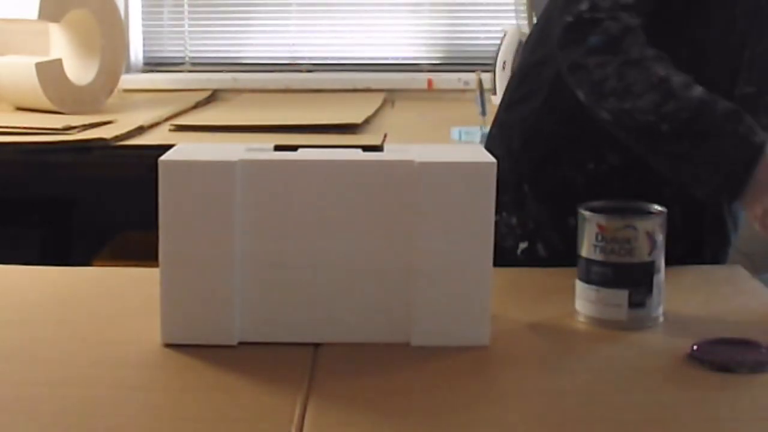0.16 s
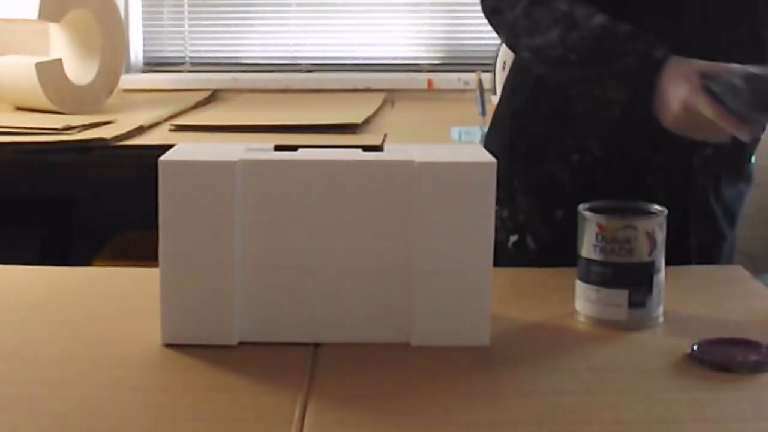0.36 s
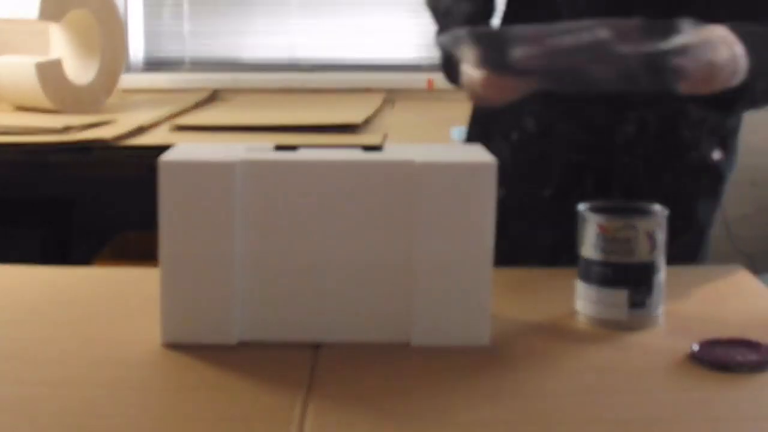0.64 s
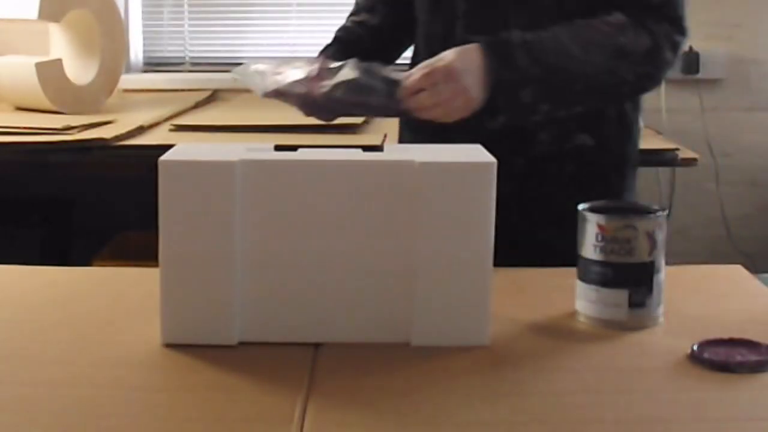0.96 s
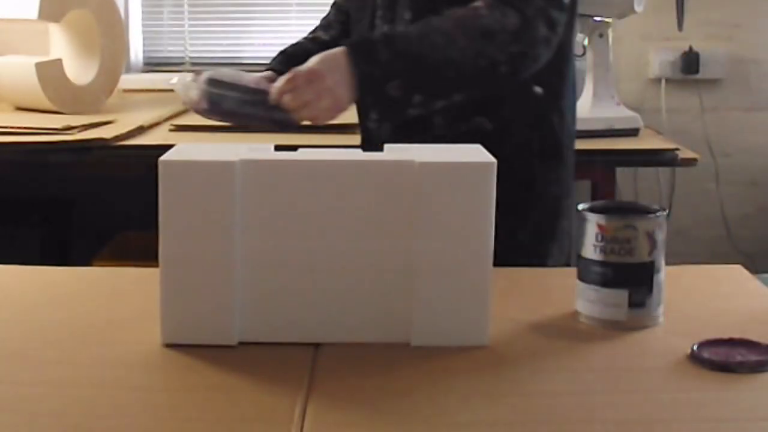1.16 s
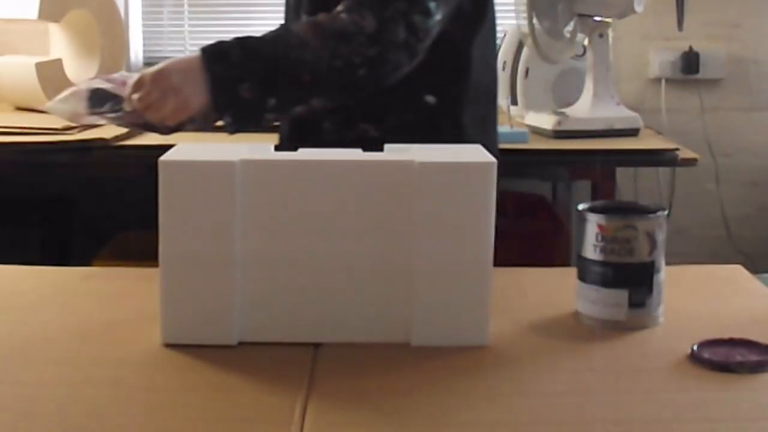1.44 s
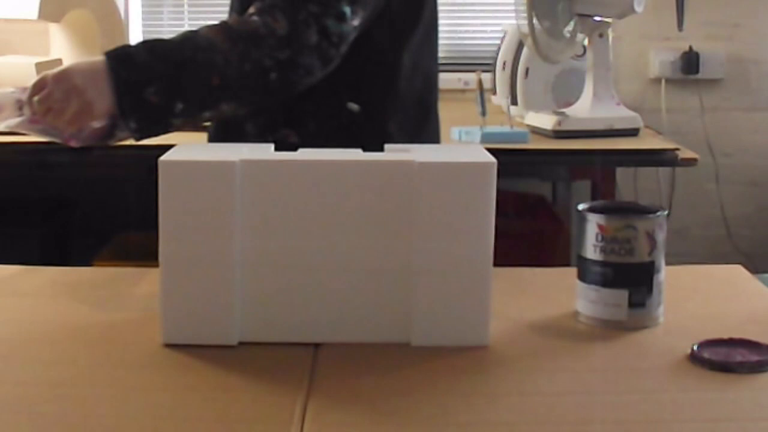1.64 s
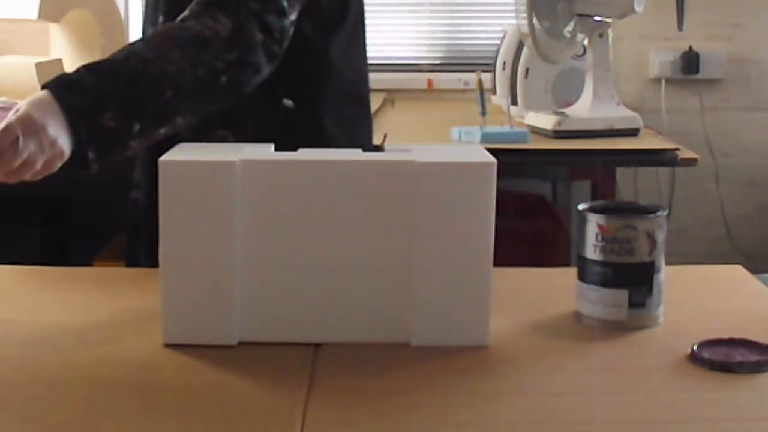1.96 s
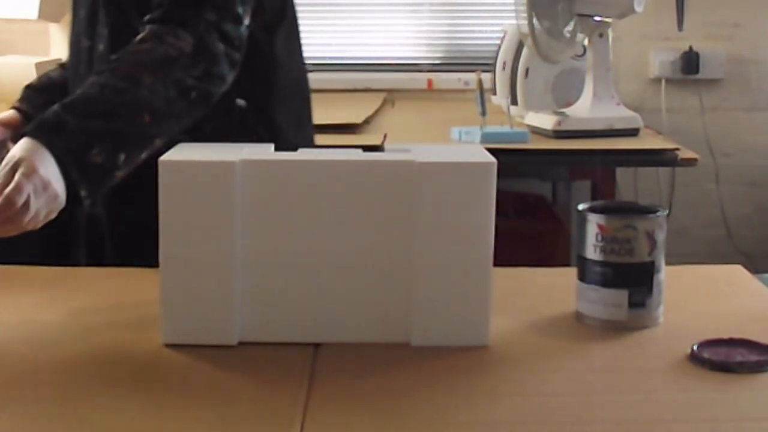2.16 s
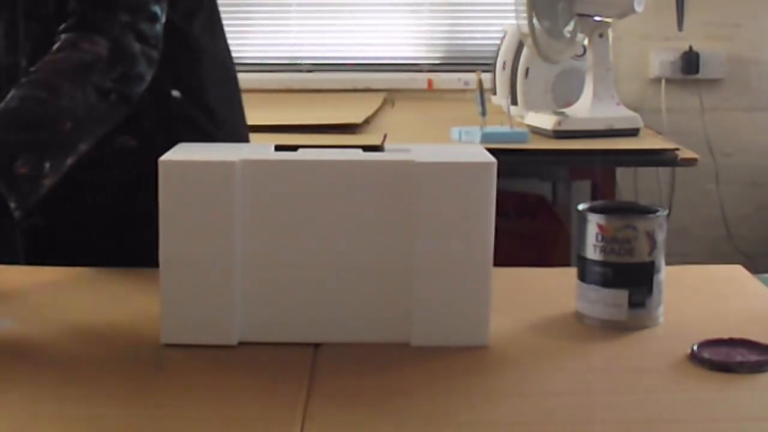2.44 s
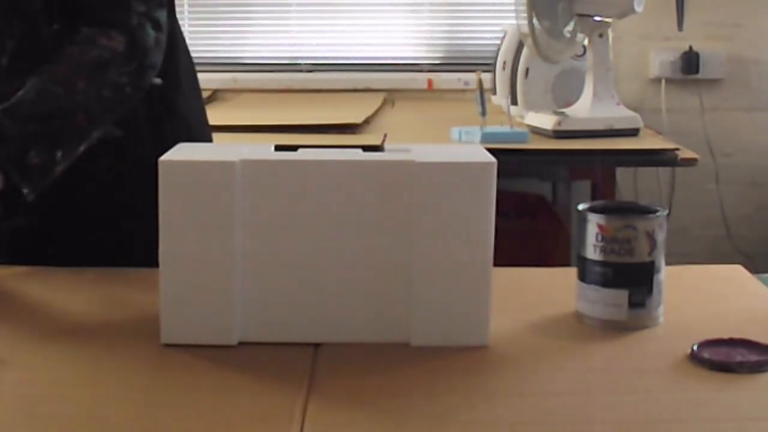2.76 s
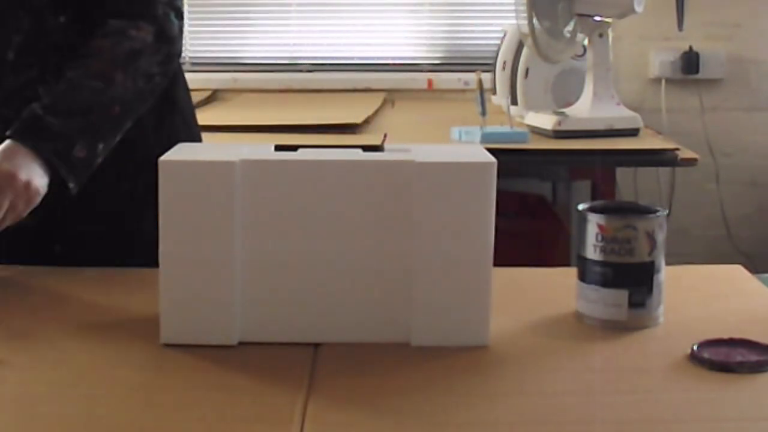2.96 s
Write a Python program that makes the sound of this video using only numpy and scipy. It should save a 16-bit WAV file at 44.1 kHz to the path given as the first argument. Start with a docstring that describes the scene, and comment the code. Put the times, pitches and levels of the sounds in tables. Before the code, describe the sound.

Plastic packaging crinkles and snaps in uneven bursts, with faint low hoots and dull bumps beneath, then thins and returns briefly near the end. Close microphone in a small room with short reflections and quiet hiss.

```python
"""Hiss, hum and a deep rumble of moving air open a small workshop, and a thin, sticky plastic film crackles close by.
A paint tray and roller in that wrap are picked up, carried across the room and put aside before two close ports.
The crackle is random clicks through film resonances, and each snapping crease is a quick run of clicks that rings.
Short low hoots are sine bursts; soft tray bumps, sleeve brushes and air puffs are swells of filtered noise.
Close reflections and a short tail place the handling in the room."""
import sys
import numpy as np
from scipy import signal
from scipy.fft import rfft, irfft
from scipy.io import wavfile

SR = 44100
rng = np.random.default_rng(int(sys.argv[2]) if len(sys.argv) > 2 else 0)


def store_pcm(level_fs):
    """Save levels as 16-bit WAV."""
    pcm = np.round(np.clip(level_fs, -1, 1) * 32767).astype(np.int16)
    wavfile.write(sys.argv[1], SR, np.atleast_2d(pcm).T)


N = 136710  # samples, 3.1 s

# steady tones in the room, a throb, hum and whine: pitch_hz, mean level_db (rms)
HUM_TONES = [(29.5, -48.5), (100.5, -55.5), (1786, -63)]
# spectrum of the room's hiss: frequency_hz, relative density_db
HISS_SPECTRUM = [(12, -56), (20, 8.5), (42, -15.5), (175, -17.5), (404, -18), (649, -23), (958, -28),
                 (1230, -27.5), (1380, -18.5), (1630, -21.5), (2270, -22.5), (3080, -16.5), (5230, -38.5),
                 (13500, -55.5), (15500, -47)]
# puffs of air on the microphone: start_s, length_s, level_db at the crest
AIR_PUFFS = [(0.814, 0.13, -26), (1.404, 0.1, -31.5), (2.022, 0.2, -35)]
# how hard the film is worked: time_s, effort_db, treble_db (sliding film, before SLIDE_DB)
FILM_HANDLING = [(0, -46, -16), (0.12, -51.5, -7), (0.204, -44, -24.0), (0.229, -28.5, -5),
                 (0.27, -26.5, -8.5), (0.319, -32.5, -30), (0.35, -32.5, -10), (0.42, -29, -20),
                 (0.49, -31.5, -19), (0.54, -27, -13), (0.61, -31.5, -19), (0.67, -31.5, -31),
                 (0.72, -39, -15), (0.77, -35.5, -5), (0.805, -44, -19), (0.855, -41, -26),
                 (0.873, -29.5, -27), (0.91, -35, -4), (0.943, -22, -13), (0.996, -29.5, -8),
                 (1.04, -27, -12), (1.08, -26.5, -25), (1.12, -27, -13), (1.152, -24, -11),
                 (1.247, -21, -13.5), (1.29, -27.5, -14), (1.35, -29, -13), (1.401, -24.0, -10),
                 (1.458, -22, -14), (1.55, -24, -8.5), (1.679, -23.5, -11.5), (1.735, -31, -37),
                 (1.785, -41, -27), (1.83, -34.5, -13), (1.92, -33.5, -24), (1.965, -39.0, -23),
                 (2.06, -46, -2), (2.17, -44.5, -20), (2.282, -42, -21.0), (2.332, -28.0, -25),
                 (2.385, -36, -24), (2.44, -30, -7.5), (2.474, -27.5, -23), (2.52, -40, -19.0),
                 (2.68, -40, -15), (2.79, -38.5, -14), (2.829, -31.5, -5.5), (2.889, -25.0, -12.5),
                 (2.94, -34.0, -15), (2.968, -30.0, -26), (3.018, -40, -7), (3.1, -32.5, -15)]
# spectrum of the plastic film: frequency_hz, relative density_db
FILM_SPECTRUM = [(240, -50), (400, -13.5), (493, -12.5), (673, -13.5), (880, -11.5), (1200, -16),
                 (1550, -10.5), (1740, -7), (2150, -8.5), (2770, -4), (3510, -1), (5820, -16),
                 (10400, -36.5), (14000, -51)]
# bands in which small buckles ring: centre_hz, level_db (relative, before the film spectrum)
BUCKLE_BANDS = [(900, 2.5), (1900, -5), (2800, 4), (3700, -8.5), (5500, -8.5), (10000, -6)]
# creases that snap: start_s, level_db (before the part levels), ring_hz, treble_db (before SNAP_TREBLE_DB)
CREASE_SNAPS = [(0.0187, -24.5, 3260, -30), (0.0931, -27.5, 2830, -28), (0.3032, -12.5, 3500, -49),
                (0.5242, -16, 3400, -28), (0.5942, -16.5, 2740, -19), (0.6501, -17.5, 2730, -33),
                (0.8663, -21.5, 3490, -29), (0.9218, -9.5, 2660, -31), (0.9323, -8.5, 3470, -25),
                (1.015, -13.5, 2750, -32), (1.0929, -9.5, 3950, -22), (1.1325, -7.5, 3670, -12),
                (1.2248, -9, 3130, -14), (1.2304, -6, 3100, -28), (1.456, -19, 3330, -29),
                (1.5942, -14.5, 3100, -33), (1.715, -20, 3220, -30), (1.8028, -18.5, 3460, -36),
                (1.8095, -14.5, 3200, -35), (1.854, -9.5, 3300, -41), (1.891, -16.5, 3120, -31),
                (1.985, -24.5, 3250, -7), (2.0463, -26.5, 3620, -23), (2.0708, -15.5, 3300, -11.5),
                (2.1894, -18, 3240, -14.5), (2.2913, -12.5, 2640, -45), (2.309, -8.5, 3320, -34),
                (2.403, -13, 2670, -24), (2.4634, -13.5, 3360, -12.5), (2.605, -18.5, 2840, -21),
                (2.8419, -8, 2800, -38), (3.0009, -18, 3450, -13)]
# short soft hoots: time_s (HOOT_LEAD_S after the onset), level_db (before HOOT_DB), pitch_hz
SOFT_HOOTS = [(0.1, -28, 306), (0.205, -27, 302), (0.298, -27, 296), (0.401, -26, 298), (0.432, -28, 290),
              (0.5, -29.5, 304), (0.568, -26, 301), (0.618, -28.5, 290), (1.048, -25, 305),
              (1.155, -27.5, 290), (1.23, -25, 283), (1.359, -23.5, 288), (1.437, -29.5, 277),
              (1.62, -28, 274)]
# dull scuffs of tray and sleeve: start_s, length_s, level_db at the crest, centre_hz
DULL_SCUFFS = [(0.683, 0.074, -45, 101), (0.922, 0.054, -42, 900), (1.196, .11, -35, 910),
               (1.208, 0.089, -40, 170), (1.373, 0.031, -29.5, 860), (1.278, 0.23, -43, 131),
               (2.003, 0.045, -41, 110), (2.045, 0.095, -37, 75), (2.062, 0.33, -41, 283),
               (2.164, 0.085, -43, 700), (2.308, 0.01, -26, 1390), (2.448, 0.04, -34, 756),
               (2.37, 0.13, -42.5, 110)]

TONE_DB, TONE_WAVER_DB = -40, 0.7  # hiss level; spread of the slow waver of hiss and tones
RUMBLE_DB, PUFF_HZ = -46, 20.4
CRACKLE_PER_S, CRACKLE_SPREAD_DB = 2500, 4  # buckling rate at an effort of BUSY_DB
BUSY_DB, RATE_POWER = -25, 0.76  # how the rate follows the effort
CRACKLE_DB, RUB_DB, SLIDE_DB = -3.5, -8.5, -8.5  # relative to the effort
OWN_SHARE = 0.91  # share of the buckle power that rings in single bands
FLUTTER_DB, FLUTTER_PER_S = 2.37, 180
TREBLE_HZ, TREBLE_WIDTH_HZ = 6940, 3820
TICKS_PER_S, TICK_SPREAD_DB, TICK_DB, TICK_TREBLE_DB = 90, 2.5, -9, -11.5
SNAP_DB, SNAP_RING_DB, SNAP_TREBLE_DB = -8.5, -5.5, 1  # broad part, ring, treble
SNAP_FIRST_DB = 3.5  # first click, over the crest of the run that follows
SNAP_DECAY_S, SNAP_AFTER_PER_S, SNAP_WIDTH_HZ = 0.0029, 1800, 730
HOOT_S, HOOT_LEAD_S, HOOT_DB = 0.032, 0.0078, -6
EARLY_S, EARLY_DB = 0.011, -6  # close reflections
ROOM_T60_S, ROOM_DB = 0.27, -9  # tail
SHIFT_S = 0.025  # time between reflection patterns
PORT_LAG_S, PORT_BASS_HZ = 2.2e-5, 293  # lag in the treble; half of it at PORT_BASS_HZ
SIDE_DB, SIDE_HZ = -2.5, 8100
TOP_HZ = 14800


def undb(db):
    """Decibels to gain."""
    return 10 ** (np.asarray(db) / 20)


def unit(x):
    """Scale to rms 1."""
    return x / np.sqrt(np.mean(x ** 2) + 1e-20)


def noise():
    """White noise."""
    return rng.standard_normal(N)


def walk(rate):
    """Random wander with `rate` new targets a second, joined by straight lines."""
    targets = rng.standard_normal(1000)
    return 0.86 * np.interp(np.arange(N) / SR * rate, np.arange(1000), targets)


def band(x, hz, width_hz):
    """One resonance."""
    centre_hz = min(hz, 0.45 * SR)
    b, a = signal.iirpeak(centre_hz, hz / min(width_hz, 0.3 * SR), fs=SR)
    return signal.lfilter(b, a, x)


def double_band(x, hz, width_hz):
    """Two equal resonances in series, for steeper skirts."""
    return band(band(x, hz, width_hz), hz, width_hz)


def treble(x):
    """The bright, papery band of the film."""
    return double_band(x, TREBLE_HZ, TREBLE_WIDTH_HZ)


def colour(x, points):
    """Causal minimum-phase filter through (frequency_hz, level_db) points."""
    hz, db = np.array(points).T
    size = 8192
    f = np.maximum(np.fft.rfftfreq(size, 1 / SR), 1)
    log_gain = np.log(undb(np.interp(np.log(f), np.log(hz), db)))
    # folding the cepstrum onto positive time makes the filter causal
    cepstrum = irfft(log_gain)
    cepstrum[1:size // 2] *= 2
    cepstrum[size // 2 + 1:] = 0
    impulse = irfft(np.exp(rfft(cepstrum)))
    return signal.fftconvolve(x, impulse)[:len(x)]


def swell(t, start, length):
    """A rounded rise and fall."""
    return np.sin(np.pi * np.clip((t - start) / length, 0, 1))


def clicks(per_s, spread_db):
    """Random clicks, many small and a few large; sparser ones are larger, which holds the mean power."""
    happens = rng.random(N) < per_s / SR
    size = np.minimum(rng.exponential(size=N), 3)
    sign = np.sign(noise())
    return unit(happens * sign * undb(spread_db * size) / np.sqrt(per_s))


def room_tone(t):
    """Wavering hiss with sine tones for a deep throb, mains hum and a thin whine."""
    out = unit(colour(noise(), HISS_SPECTRUM)) * undb(TONE_DB + TONE_WAVER_DB * walk(7.6))
    for hz, db in HUM_TONES:
        level = undb(db + TONE_WAVER_DB * walk(5.2))
        out += level * np.sqrt(2) * np.sin(2 * np.pi * hz * t)
    return out


def air(t):
    """Moving air on the microphone: a steady deep noise rumble, with puffs as the person moves."""
    rumble = unit(double_band(noise(), 25, 23))
    puff_level = sum(undb(db) * swell(t, start, length) for start, length, db in AIR_PUFFS)
    puff_noise = unit(double_band(noise(), PUFF_HZ, PUFF_HZ))
    return undb(RUMBLE_DB) * rumble + puff_level * puff_noise


def crackle(t):
    """Tiny buckles, broad or ringing in one band and sparser when the grip eases, over film sliding on film."""
    times, level_db, treble_db = np.array(FILM_HANDLING).T
    effort_db = np.interp(t, times, level_db)
    rate = CRACKLE_PER_S * undb(effort_db - BUSY_DB) ** RATE_POWER
    shared = clicks(rate, CRACKLE_SPREAD_DB)
    broad = unit(colour(shared, FILM_SPECTRUM))
    ringing = np.zeros(N)
    for hz, db in BUCKLE_BANDS:
        ringing += undb(db) * band(clicks(rate / 2, CRACKLE_SPREAD_DB), hz, hz / 2)
    ringing = unit(colour(ringing, FILM_SPECTRUM))
    buckles = np.sqrt(1 - OWN_SHARE) * broad + np.sqrt(OWN_SHARE) * ringing
    slide = undb(np.interp(t, times, treble_db) + SLIDE_DB) * unit(treble(shared))
    rub = undb(RUB_DB) * unit(colour(noise(), FILM_SPECTRUM))
    level = undb(effort_db + FLUTTER_DB * walk(FLUTTER_PER_S))
    return level * (undb(CRACKLE_DB) * buckles + slide + rub)


def ticks(t):
    """Lone, sharp buckles that stand out of the crackle and follow the same effort."""
    times, level_db, _ = np.array(FILM_HANDLING).T
    pops = clicks(TICKS_PER_S, TICK_SPREAD_DB)
    level = undb(np.interp(t, times, level_db) + TICK_DB)
    bright = undb(TICK_TREBLE_DB) * unit(treble(pops))
    return level * (unit(colour(pops, FILM_SPECTRUM)) + bright)


def snaps(t):
    """A crease gives way in a quick run of clicks that builds and dies, ringing its patch of film."""
    out, age = np.zeros(N), t[:SR // 16]
    build_and_die = age / SNAP_DECAY_S * np.exp(1 - age / SNAP_DECAY_S)
    for start, db, hz, treble_db in CREASE_SNAPS:
        happens = rng.random(len(age)) < SNAP_AFTER_PER_S / SR
        push = happens * rng.choice([-1, 1], len(age)) * build_and_die
        push[0] = undb(SNAP_FIRST_DB)
        broad = colour(push, FILM_SPECTRUM)
        ring = band(band(push, hz, SNAP_WIDTH_HZ), hz, hz)
        bright = treble(push)
        # each part is brought to a peak of 1 before its level
        snap = undb(SNAP_DB) * broad / np.abs(broad).max()
        snap += undb(SNAP_RING_DB) * ring / np.abs(ring).max()
        snap += undb(treble_db + SNAP_TREBLE_DB) * bright / np.abs(bright).max()
        i = max(int(start * SR), 0)
        out[i:i + len(age)] += undb(db) * snap[:N - i]
    return out


def hoots(t):
    """Soft sine bursts a few cycles long, with rounded edges."""
    out = np.zeros(N)
    for start, db, hz in SOFT_HOOTS:
        envelope = swell(t, start - HOOT_LEAD_S, HOOT_S) ** 2
        out += undb(db + HOOT_DB) * envelope * np.sin(2 * np.pi * hz * (t - start))
    return out


def scuffs(t):
    """Brief dull friction of tray and cloth: swells of broad-band noise."""
    out = np.zeros(N)
    for start, length, db, hz in DULL_SCUFFS:
        friction = unit(double_band(noise(), hz, 2.6 * hz))
        out += undb(db) * swell(t, start, length) * friction
    return out


def workshop(x, t):
    """Close reflections from the bench and a short tail; their pattern shifts as the tray moves."""
    age, hop = t[:SR // 4], int(SHIFT_S * SR)
    early = np.exp(-age / EARLY_S) * (age > 0.001)
    tail = np.exp(-np.log(1000) * age / ROOM_T60_S) * (age > 0.008)
    early *= undb(EARLY_DB) / np.linalg.norm(early)
    tail *= undb(ROOM_DB) / np.linalg.norm(tail)
    decay = np.hypot(early, tail)
    padded, out = np.pad(x, (hop, 2 * hop)), np.zeros(N + SR)
    window = np.sin(np.pi * np.arange(2 * hop) / (2 * hop))
    # overlapping slices of sound, each with a fresh random pattern
    for i in range(0, N + hop, hop):
        reflections = decay * rng.standard_normal(len(age))
        echo = signal.fftconvolve(padded[i:i + 2 * hop] * window, reflections)
        out[i:i + len(echo)] += echo
    return out[hop:hop + N]


def scene():
    """Sound reaches the right port first; the bass is alike in both, the reflections differ in the treble."""
    t, f = np.arange(N) / SR, np.fft.rfftfreq(2 * N, 1 / SR)
    dry = crackle(t) + ticks(t) + snaps(t) + scuffs(t)
    mid = rfft(dry + workshop(dry, t) + hoots(t) + air(t) + room_tone(t), 2 * N)
    # a second, independent room and hiss, added to one port and taken from the other
    side_gain = undb(SIDE_DB) * 2 * f ** 2 / (f ** 2 + SIDE_HZ ** 2)
    side = side_gain * rfft(workshop(dry, t) + room_tone(t), 2 * N)
    lag_s = PORT_LAG_S * f / (f + PORT_BASS_HZ)
    left = (mid + side) * np.exp(-2j * np.pi * f * lag_s)
    right = mid - side
    return irfft(np.array([left, right]))[:, :N]


def record(dry):
    """The recorder cuts the top with a steep low-pass."""
    low_pass = signal.ellip(8, 0.2, 80, TOP_HZ, fs=SR, output="sos")
    return signal.sosfilt(low_pass, dry)


dry = scene()
out = record(dry)
store_pcm(out)
```